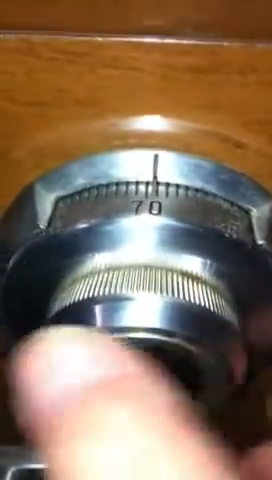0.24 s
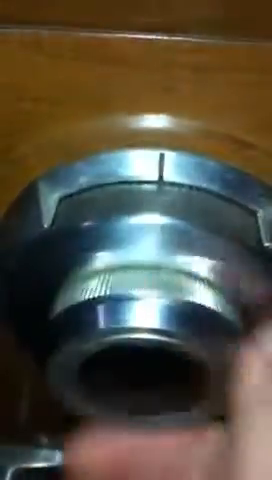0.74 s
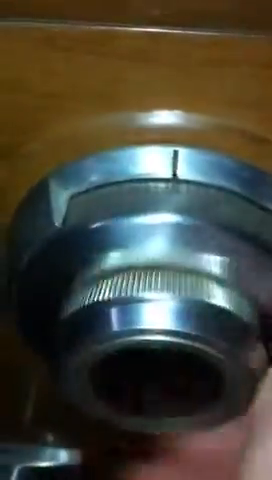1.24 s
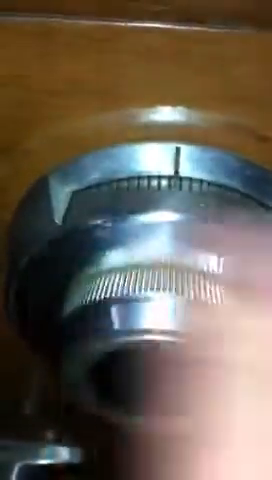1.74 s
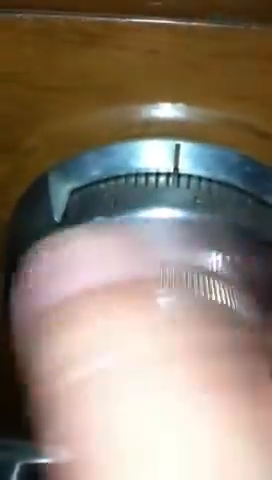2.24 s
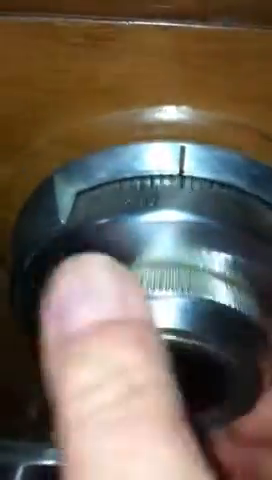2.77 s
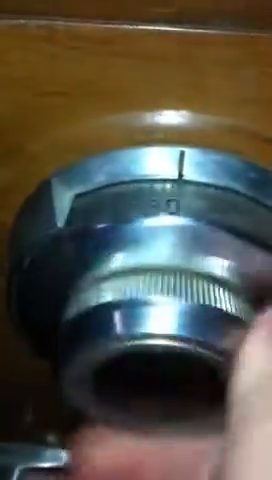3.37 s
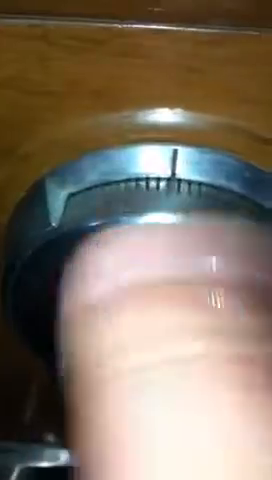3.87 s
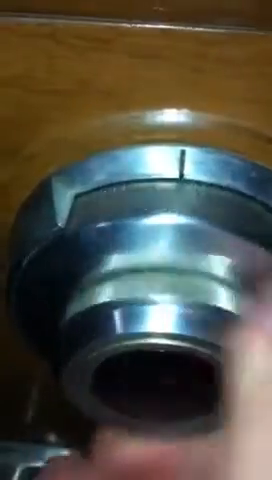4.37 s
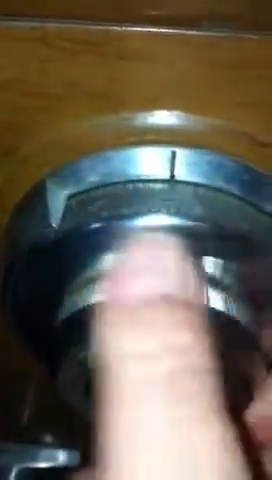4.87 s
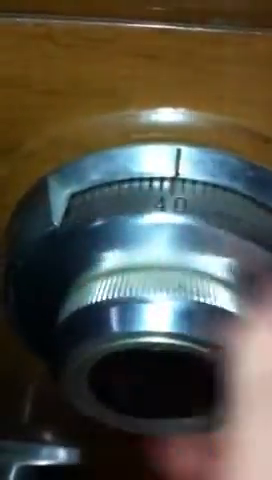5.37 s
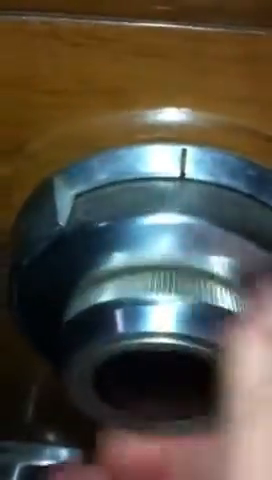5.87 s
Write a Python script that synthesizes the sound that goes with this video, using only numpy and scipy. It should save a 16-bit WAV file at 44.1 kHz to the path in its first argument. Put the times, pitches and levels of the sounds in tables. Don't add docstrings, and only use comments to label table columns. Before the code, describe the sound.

A metal combination dial is spun by hand close by, with sharp irregular clicks, gritty rubbing, and a few loud clacks that ring faintly.

```python
import sys
import numpy as np
from scipy import signal
from scipy.fft import rfft, irfft
from scipy.io import wavfile

SR = 44100
rng = np.random.default_rng(int(sys.argv[2]) if len(sys.argv) > 2 else 0)


def materialize(psi):
    bounded = np.clip(np.atleast_2d(psi).T, -1, 1)
    quanta = np.round(bounded * 32767).astype(np.int16)
    wavfile.write(sys.argv[1], SR, quanta)


def linear_from_db(decibels):
    return 10 ** (np.asarray(decibels, float) / 20)


N = 269892


def in_time(rows):
    s, *columns = np.transpose(rows)
    return [np.interp(np.arange(N) / SR, s, c) for c in columns]


def coloured(spectrum, x):
    hz, level_db = np.transpose(spectrum)
    bin_hz = np.maximum(np.fft.rfftfreq(N, 1 / SR), 1)
    gain = linear_from_db(np.interp(np.log(bin_hz), np.log(hz), level_db))
    return irfft(rfft(x) * gain / np.sqrt(np.mean(gain ** 2)), N)


def band(x, low_hz, high_hz):
    return signal.sosfilt(signal.butter(3, [low_hz, high_hz], "band", fs=SR, output="sos"), x)


def ring(force, modes):
    out = 0
    for k, (hz, level_db, t60_s) in enumerate(modes):
        r = linear_from_db(-60 / (t60_s * SR))
        w = 2 * np.pi * hz / SR
        mode = signal.lfilter([0, np.sin(w)], [1, -2 * r * np.cos(w), r * r], force + 1e-18)
        out = out + (-1) ** k * linear_from_db(level_db) * mode
    return out


def dense_body(force, t60_s):
    r = linear_from_db(-120 / (t60_s * SR))
    energy = signal.lfilter([1 - r], [1, -r], force ** 2 + 1e-18)
    return np.sqrt(energy) * rng.standard_normal(N)


def contacts(per_s, spread_db):
    sizes = linear_from_db(spread_db * np.minimum(rng.exponential(1, N), 4)) * rng.choice([-1, 1], N)
    x = sizes * (rng.random(N) < per_s / SR)
    return x / np.std(x)


def struck(events, reach_db, plate_share):
    rows = []
    for s, db, ring_db, bright_db in events:
        tilt_db = [plate_share * ring_db, 0, 0, ring_db, bright_db]
        rows.append((s, *(db + np.add(reach_db, tilt_db))))
    return rows


# [t/s, level/dB]
SLEEVE_LEVEL = [
    (0.0, -59.5),
    (0.068, -55.5),
    (0.17, -57.5),
    (0.362, -54.5),
    (0.51, -60),
    (0.536, -75),
    (0.62, -63.5),
]
# [f/Hz, density/dB per Hz]
CLOTH_COLOUR = [(120, -15), (200, -10), (387, 3), (601, -6), (950, -5), (1060, -4.5), (2050, -3.5),
                (13100, -13), (16000, -21)]


def sleeve():
    level_db, = in_time(SLEEVE_LEVEL)
    cloth = coloured(CLOTH_COLOUR, rng.standard_normal(N))
    return linear_from_db(level_db) * cloth * (np.arange(N) < SLEEVE_LEVEL[-1][0] * SR)


# [f/Hz, density/dB per Hz]
AIR_COLOUR = [(25, -36.5), (64, -24.5), (95, -14.5), (120, -3.5), (217, 0.5), (293, -8), (624, -8.5),
              (796, -13.5), (1230, -17), (2110, -23), (2690, -24.5), (5280, -25), (12900, -25.5),
              (16000, -27)]


def air():
    return linear_from_db(-61.5) * coloured(AIR_COLOUR, rng.standard_normal(N))


# [t/s, strength/dB, dial ring/dB, brightness/dB]
FINGER_GRIPS = [(0.695, -39.5, -5, -9), (1.094, -39, 4.5, -9.5), (1.128, -43.5, -26, -21),
                (1.139, -60, -29, -21), (1.16, -50, -2, -1), (1.183, -51, -12, -20), (1.317, -53, -14, -19),
                (2.052, -50.5, 1, -3.5), (2.196, -50, -9, -20), (2.403, -45, -5.5, -28.5),
                (2.615, -51.5, 0, -10.5), (2.897, -49.5, -12, -12), (3.544, -41, -9.5, -14.5),
                (3.596, -52, -5.5, -12), (3.708, -48.5, -11.5, -12), (3.74, -44, -6, -18),
                (4.062, -39.5, -1, -8.5), (4.393, -37.5, -5, -11), (4.418, -47, -13, -1),
                (4.977, -47.5, -10, -13), (5.028, -33, -1, 1), (5.12, -56, -2, -10),
                (5.302, -43.5, -1.5, -2), (5.418, -53, -7, -7.5), (5.571, -40, 9, -4.5),
                (5.597, -39, 3.5, -5.5), (5.649, -50, -1.5, -12), (5.678, -48, -14.5, -7),
                (5.882, -45.5, -7, -4.5), (5.909, -57, 7, 4)]


def grips():
    return struck(FINGER_GRIPS, reach_db=(2, 0.3, -5, -2, -3.5), plate_share=1)


# [start t/s, length/s, door drag/dB, dial grit/dB]
SPINDLE_TURNS = [(0.695, 0.17, -55, -63), (1.09, 0.35, -56.5, -71), (1.597, 0.26, -52, -74.5),
                 (2.051, 0.071, -65, -70.5), (2.126, 0.1, -57, -66), (2.396, 0.045, -57, -75.5),
                 (2.486, 0.13, -54.5, -70), (2.951, .11, -56.5, -69.5), (3.367, 0.26, -56.5, -70),
                 (3.74, 0.091, -43, -56), (3.845, .05, -60, -68), (4.058, 0.15, -58, -67),
                 (4.39, .14, -61.5, -71.5), (4.69, 0.054, -55.5, -66), (4.839, 0.17, -52, -72),
                 (5.03, 0.12, -55, -62.5), (5.294, 0.022, -60, -69.5), (5.341, 0.085, -57, -60.5),
                 (5.57, .21, -57, -72), (5.879, .22, -55, -71.5)]


def turning():
    peak_share, swell_db, fade_db = 0.15, 7.5, -4.5
    rows = []
    for s, length_s, drag_db, grit_db in SPINDLE_TURNS:
        level_db = np.array([drag_db, grit_db])
        end_s = s + length_s
        rows += [(s - .005, -100, -100), (s, *level_db)]
        rows += [(s + peak_share * length_s, *(level_db + swell_db))]
        rows += [(end_s, *(level_db + fade_db)), (end_s + .025, -100, -100)]
    return in_time(rows)


# [t/s, level/dB]
PAD_THUMPS = [
    (.701, -41),
    (1.135, -47),
    (2.408, -44),
    (3.714, -47),
    (4.069, -44),
    (4.09, -47),
    (4.401, -34.5),
    (5.606, -45),
    (5.655, -47),
    (5.89, -45),
]
# [f/Hz, level/dB, t60/s]
PANEL_MODES = [(402, -5, 0.046), (465, 0.1, 0.057)]


def thumps():
    push_s, push_hz = .012, 448
    s, db = np.transpose(PAD_THUMPS)
    t = np.arange(round(push_s * SR)) / SR
    clicks = np.zeros(N)
    clicks[(s * SR).astype(int)] = linear_from_db(db)
    push = np.sin(np.pi * t / push_s) * np.sin(2 * np.pi * push_hz * t)
    return ring(np.convolve(clicks, push / np.sum(np.abs(push)))[:N], PANEL_MODES)


# [t/s, strength/dB, door and case thud/dB, brightness/dB]
KNOB_TICKS = [(0.7237, -46, -17, 3), (0.7434, -37, -14, -10), (0.7697, -39, -25, -2.5),
              (0.815, -41, -4, -10), (1.0415, -57, -3, 3.5), (1.2067, -49, 1, -2), (1.28, -42, 3, 3),
              (1.3004, -36.5, -8, 1.5), (2.086, -50, -7, -12), (2.1472, -43, -8, -10),
              (2.175, -37.5, -15, -2.5), (2.2162, -48.5, -3, -2), (2.5031, -41.5, -11, -28),
              (2.5174, -58, 2, -10), (2.5296, -45.5, -1, -17), (2.5511, -45, -10, -9.5),
              (2.9884, -35, -18, 1), (3.7864, -38, -19, -21), (3.8024, -49, 0, -9),
              (4.0855, -45.5, -10, -14.5), (4.125, -40.5, -4, -10.5), (4.158, -49.5, 5.5, -15),
              (4.4455, -53, -3, -16), (4.4844, -44, -5, 2.5), (4.7022, -37.5, -10, -5),
              (5.3271, -39, -9, -9), (5.3457, -34, -10, -7.5), (5.3657, -33.5, -13, -2),
              (5.3901, -35, -6, -16), (5.9377, -33.5, -13, 0)]


def ticks():
    reach_db = (-7, -6, -3, -0.6, -4.5)
    rows = []
    for s, db, thud_db, bright_db in KNOB_TICKS:
        rows.append((s, *(db + np.add(reach_db, [0, thud_db, thud_db, 0, bright_db]))))
    return rows


# [t/s, strength/dB, dial ring/dB, brightness/dB]
WHEEL_PINS = [(0.787, -57, 12, -12), (0.838, -51, -15, -3), (1.235, -33.5, -1, -1.5), (1.254, -28, 1, 1.5),
              (1.288, -37.5, -10, -6.5), (1.716, -25.5, -3, -5.5), (2.123, -42, -6, -7),
              (2.439, -46, -17.5, -18), (2.954, -48, 3.5, 2), (3.004, -29, -3.5, 0.5),
              (3.368, -39.5, 10.5, 4.5), (3.752, -25, -4, -8.5), (3.773, -24, -3, -8),
              (3.822, -39.5, -4, 2.5), (3.84, -37.5, -1.5, -20), (4.494, -34, -4, -7), (4.527, -52, 1, -8),
              (4.689, -46, 0.5, -4.5), (4.716, -45, 1.5, -11.5), (5.08, -21, -6, -8), (5.959, -29, -1, 0),
              (5.986, -39.5, 2, 0.5), (6.017, -43.5, -1.5, 6.5), (6.053, -57, -15, -15.5)]


def pins():
    return struck(WHEEL_PINS, reach_db=(-5, -12, -3.5, -4, -3.5), plate_share=0.5)


# [t/s, strength/dB, dial ring/dB, brightness/dB]
WHEEL_SLACK = [(1.2627, -46, 7, 3), (1.6125, -41, -6, -1.5), (1.6196, -34.5, 2, -1), (1.651, -42, 12, 9),
               (3.0164, -54, -4, 3), (3.387, -44, 12, -4.5), (3.4258, -36, 10.5, -6),
               (4.7569, -29, -8, -13), (4.765, -36, 1, -5.5), (4.794, -30.5, 0, -5),
               (4.8472, -43, -10.5, -10)]


def slack():
    return struck(WHEEL_SLACK, reach_db=(-8.5, -7.5, 0.5, 3, -0.4), plate_share=0.5)


# [t/s, strength/dB, rebound delay/s, rebound/dB]
PACK_SLAMS = [
    (1.6264, -13, .034, -17),
    (3.3929, -13.5, .0493, -16.5),
    (4.7679, -14.5, .0415, -17.5),
]
# [delay/s, plate/dB, door/dB, case/dB, dial/dB, small parts/dB]
SLAM_CONTACTS = [
    (.0008, -4.5, -16.5, -9.5, 1.5, 2),
    (.0086, -22.5, -26.5, -22, -18, -12.5),
]
# [delay/s, plate/dB, door/dB, case/dB, dial/dB, small parts/dB]
REBOUND_CONTACTS = [
    (0, -3.5, -21, -10.5, 1.5, -5),
    (.0045, -14.5, -27.5, -14.5, -4.5, 1.5),
    (.015, -25.5, -14.5, -24.5, -15, -14),
]


def slams():
    rows = []
    for s, db, after_s, rebound_db in PACK_SLAMS:
        rows += [(s + lag_s, *np.add(db, parts)) for lag_s, *parts in SLAM_CONTACTS]
        rows += [(s + after_s + lag_s, *np.add(rebound_db, parts)) for lag_s, *parts in REBOUND_CONTACTS]
    return rows


def knock_force(column, lead):
    push, first = np.zeros(N + 2000), np.zeros(N)
    t = np.arange(2000) / SR
    for row in grips() + ticks() + pins() + slack() + slams():
        length_s = .0008 * linear_from_db(np.clip(0.082 * (row[5] + 45), -4, 4))
        shape = t / length_s * np.exp(-t / length_s) + 0.18 * np.exp(-t / (5.0 * length_s))
        at = round(row[0] * SR)
        push[at:at + 2000] += linear_from_db(row[column]) * shape / np.sqrt(np.sum(shape ** 2))
        first[at + round(.6 * length_s * SR)] = linear_from_db(row[column])
    return lead * first + push[:N] * contacts(9000, spread_db=1.5)


def back_plate(rub):
    force = linear_from_db(27.5) * knock_force(column=1, lead=0.13) + rub
    return band(dense_body(force, 0.033) + 0.3 * force, 974, 1900)


# [f/Hz, level/dB, t60/s]
CABINET_MODES = [(127, -5.5, 0.1), (201, 1, .4), (230.6, -8, 0.51)]
# [f/Hz, level/dB, t60/s]
DOOR_MODES = [(322, -6, 0.023), (399, -7.5, 0.11), (463, -4, 0.1), (562, -1.5, 0.049)]


def door(rub):
    knock = linear_from_db(-1) * knock_force(column=2, lead=0.18)
    low = linear_from_db(-21.5) * band(ring(knock, CABINET_MODES), 60, 210)
    boom = linear_from_db(32) * band(dense_body(knock, 0.89), 115, 450)
    give = linear_from_db(21) * band(dense_body(knock, 0.11), 25, 73)
    wood = band(ring(knock + linear_from_db(-31.0) * rub, DOOR_MODES), 250, 1400)
    return low + boom + give + wood


# [f/Hz, level/dB, t60/s]
CASE_MODES = [(704, -3.5, 0.018), (757, -8, 0.081), (852, 2.5, 0.022), (935, -11.5, 0.009)]


def lock_case(rub):
    force = linear_from_db(-6.5) * knock_force(column=3, lead=2.5) + linear_from_db(-30.0) * rub
    return band(ring(force, CASE_MODES), 530, 1700)


# [f/Hz, level/dB, t60/s]
DIAL_MODES = [(2385.5, -4, 0.018), (2404.5, 0.5, 0.03), (2502, -6, 0.039), (2606, -3.5, 0.012)]


def metal_dial(rub):
    force = linear_from_db(1.5) * knock_force(column=4, lead=1.0) + linear_from_db(-16.5) * rub
    return band(ring(force, DIAL_MODES), 1500, 5000)


# [f/Hz, density/dB per Hz]
METAL_COLOUR = [(1710, -38), (2900, -8), (4690, -4), (5110, -10.5), (6320, -1.5), (8510, -7), (10700, -3),
                (12800, -5), (14500, -2), (15900, -13.5), (16500, -19.5)]
# [f/Hz, level/dB, t60/s]
BRIGHT_MODES = [(3870, -5, .025), (4090, -6, .025), (6200, -2, .012), (9000, -7, .015), (11000, -2, .012),
                (11850, -4, .012), (14100, -2, .01)]


def small_parts(rub_level, soft):
    knock = knock_force(column=5, lead=0.18)
    clack = dense_body(knock, .018)
    rattle = linear_from_db(-8.5) * dense_body(knock, 0.072) * contacts(5000, spread_db=2.0)
    hiss = linear_from_db(-7.5) * rub_level * dense_body(soft, 0.0056)
    metal = coloured(METAL_COLOUR, linear_from_db(17) * (clack + rattle) + linear_from_db(4) * knock + hiss)
    return metal + linear_from_db(-5.5) * band(ring(knock, BRIGHT_MODES), 4300, 17000)


BLOW_S = {"first": 1.667, "second": 3.446, "third": 3.772, "fourth": 4.812}
PART_HZ = {"lever": 1001, "fence": 1755, "wheel": 2105, "pin": 8958}
# [blow, part, level/dB, t60/s]
SPRING_RINGS = [
    ("first", "fence", -55.5, 0.8),
    ("second", "fence", -61.5, 1.0),
    ("third", "fence", -61, 0.65),
    ("fourth", "fence", -57, 0.6),
    ("second", "lever", -43, 0.25),
    ("fourth", "wheel", -52.5, 0.45),
    ("second", "pin", -57, 0.25),
    ("fourth", "pin", -50, 0.25),
]


def springs():
    out = 0
    for blow, part, level_db, t60_s in SPRING_RINGS:
        click = 1. * (np.arange(N) == round(BLOW_S[blow] * SR))
        out = out + ring(click, [(PART_HZ[part], level_db, t60_s)])
    return out


def lock():
    drag_db, grit_db = turning()
    drag, grit = linear_from_db(drag_db), linear_from_db(grit_db)
    soft = contacts(2500, spread_db=4.0)
    scratch = linear_from_db(7.5) * grit * band(contacts(450, spread_db=4.0), 1300, 4500)
    rest = back_plate(linear_from_db(13.0) * grit * soft) + door(drag * soft) + lock_case(drag * soft)
    rest = rest + small_parts(grit, soft) + scratch + thumps() + springs()
    return metal_dial(grit * soft), rest


def room(x):
    t60_s, wall_cut_hz = 0.2, 11000
    t = np.arange(SR // 2) / SR
    white = rng.standard_normal(len(t)) * (t > .006)
    dull = signal.sosfilt(signal.butter(1, wall_cut_hz / 4, fs=SR, output="sos"), white)
    tail = dull * linear_from_db(-60 * t / t60_s) + 0.18 * (white - dull) * linear_from_db(-60 * t / (0.15 * t60_s))
    return signal.fftconvolve(x, tail / np.sqrt(np.sum(tail ** 2)))[:N]


def scene():
    dial, rest = lock()
    wet = linear_from_db(-16.5) * room(rest + linear_from_db(-10) * dial)
    return (dial + rest + wet + sleeve() + air())[None]


def band_limit(x):
    return signal.sosfilt(signal.butter(12, 16970, fs=SR, output="sos"), x)


def record(dry):
    cutoff_hz = 15900
    mix = signal.sosfilt(signal.cheby2(16, 27, 1.012 * cutoff_hz, fs=SR, output="sos"), dry)
    return band_limit(mix)


dry = scene()
out = record(dry)
materialize(out)
```